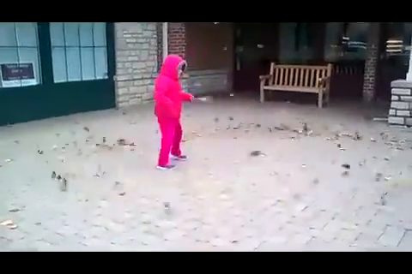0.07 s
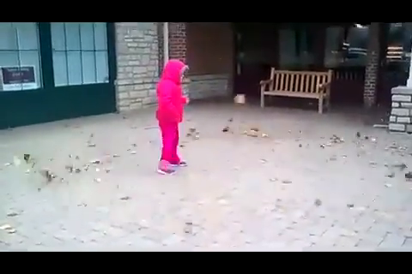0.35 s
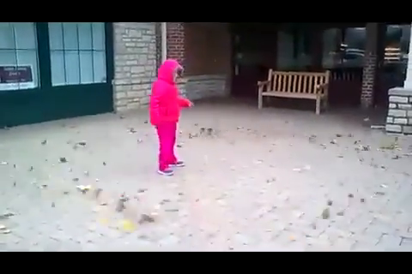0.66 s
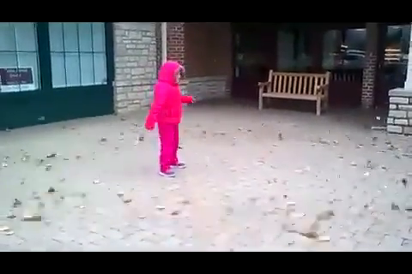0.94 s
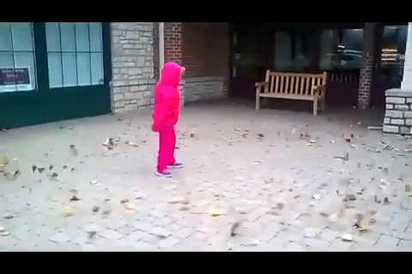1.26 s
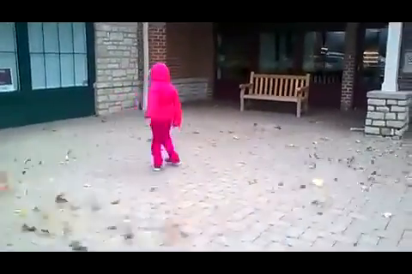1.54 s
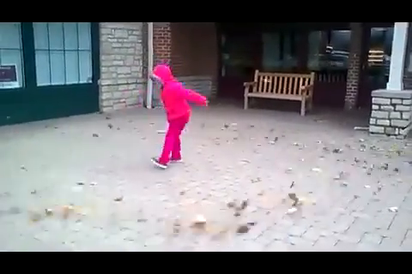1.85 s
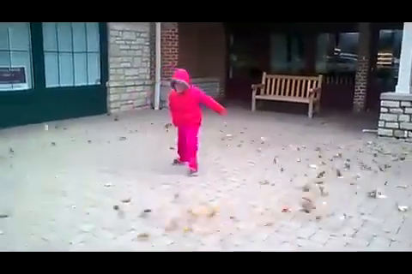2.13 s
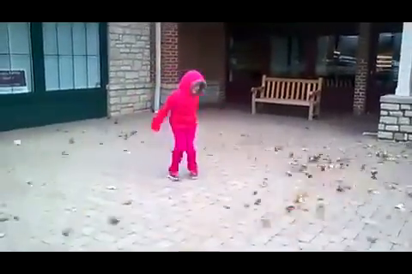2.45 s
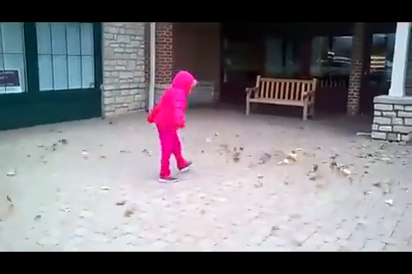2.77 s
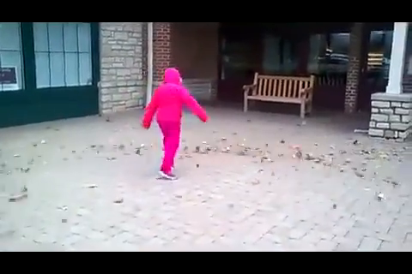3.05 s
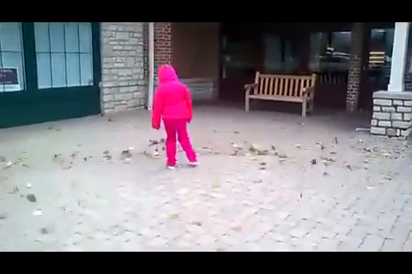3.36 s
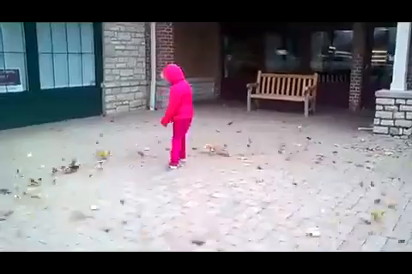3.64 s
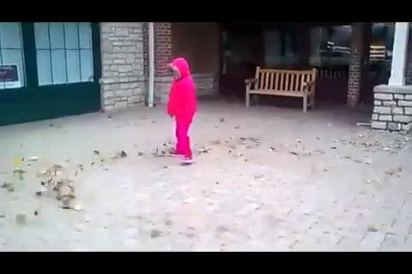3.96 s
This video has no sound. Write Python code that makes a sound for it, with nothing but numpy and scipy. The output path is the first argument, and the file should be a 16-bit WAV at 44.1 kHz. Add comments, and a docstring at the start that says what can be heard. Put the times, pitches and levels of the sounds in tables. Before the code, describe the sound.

Wind rumbles and thumps on the microphone as dry leaves swirl and scrape over paving.

```python
"""Gusty wind whirls dry leaves round a brick courtyard and buffets the microphone.
Eddies right on the microphone make a rumble that brightens as the air speeds up, with sharp thumps
as vortex cores cross it. Hundreds of leaves scrape and tick on the paving, and a few crackle close by.
Further off lies a steady rush of air and leaves."""
import sys
import numpy as np
from scipy import signal
from scipy.fft import rfft, irfft
from scipy.io import wavfile

SR = 44100
rng = np.random.default_rng(int(sys.argv[2]) if len(sys.argv) > 2 else 0)


def generate_wav(sig):
    """Save sig (samples, or channels by samples) to the path in sys.argv[1] as 16-bit PCM at SR."""
    pcm = np.round(np.clip(np.atleast_2d(sig).T, -1, 1) * 32767).astype(np.int16)
    wavfile.write(sys.argv[1], SR, pcm)


N = 4 * SR

# how hard the wind drives the leaves round the courtyard: t/s, level/dB
LEAF_DRIVE = [(0, 0.5), (.3, 0), (.65, 1), (.83, 1), (.97, 0.5), (1.17, 2), (1.32, 1.5), (1.8, 1),
              (2.25, 0.7), (2.46, -1), (2.59, .5), (2.72, -1.5), (2.98, 0), (3.34, -1), (3.45, 0),
              (3.77, 0.5), (3.88, -1), (4, 0)]


def undb(db):
    """Decibels to gain."""
    return 10 ** (np.asarray(db) / 20)


def unit(x):
    """Scale to rms 1."""
    return x / np.sqrt(np.mean(x ** 2))


def curve(rows):
    """Join (t/s, value) rows by straight lines."""
    return np.interp(np.arange(N) / SR, *np.array(rows).T)


def db_at(spectrum, hz):
    """Read (f/Hz, level/dB) rows on a log-frequency axis."""
    f, db = np.array(spectrum).T
    return np.interp(np.log(np.maximum(hz, 1)), np.log(f), db)


def colour(x, spectrum):
    """Filter by (f/Hz, level/dB) rows."""
    f = np.fft.rfftfreq(len(x), 1 / SR)
    return irfft(rfft(x) * undb(db_at(spectrum, f)), len(x))


def band(x, hz, octaves):
    """Cosine-shaped band that falls to zero this many octaves either side of hz."""
    away = np.log2(np.maximum(np.fft.rfftfreq(N, 1 / SR), 1) / hz) / octaves
    return irfft(rfft(x) * np.cos(np.pi / 2 * np.clip(away, -1, 1)), N)


def wander(per_s):
    """Smooth random motion of rms 1 that changes about per_s times a second."""
    f = np.fft.rfftfreq(N, 1 / SR)
    return unit(irfft(rfft(rng.standard_normal(N)) / (1 + (2 * f / per_s) ** 2), N))


def add(out, start_s, sound):
    """Mix a sound in at a time."""
    i = max(int(start_s * SR), 0)
    part = out[i:i + len(sound)]
    part += sound[:len(part)]


def rumble():
    """Large slow eddies rock the pressure at the microphone."""
    # swell of the deep rumble: t/s, level/dB
    swell = [(0, -15.5), (.1, -17.5), (.2, -17), (.38, -19.5), (.56, -22), (.79, -19.5), (.92, -28),
             (1.2, -31), (1.4, -28), (1.95, -23.5), (2.07, -29.5), (2.18, -19.5), (2.45, -28),
             (2.75, -22.5), (2.95, -34.5), (3.15, -21), (3.36, -32), (3.55, -16), (3.67, -28.5),
             (3.88, -22), (4, -35)]
    # spectrum of the slow pressure swings: f/Hz, level/dB
    spectrum = [(8, -29), (17, -1), (27, 2.5), (45, -5), (70, -10.5), (110, -24), (300, -58), (1000, -84)]
    return unit(colour(rng.standard_normal(N), spectrum)) * undb(curve(swell))


def buffeting():
    """Turbulence right on the microphone; faster air lifts the high bands more than the bass."""
    # airflow at the microphone between eddies: t/s, level/dB
    airflow = [(0, -8), (.15, -1.5), (.33, -7), (.43, -21), (.55, -3.5), (.77, -14), (.84, -21),
               (.95, -12.5), (1.2, -20.5), (1.5, -17), (1.85, -16), (2.2, -7), (2.3, -12.5), (2.5, -24),
               (2.95, -20), (3.35, -16), (3.55, -11), (3.7, -24), (4, -14)]
    # eddies that hit the microphone: centre t/s, length/s, level/dB
    eddies = [(.005, 0.021, 4), (0.095, 0.03, 0), (.203, 0.015, 2), (0.224, .012, 7.5), (0.246, 0.025, 4),
              (0.303, 0.037, 4), (0.381, 0.09, 1.5), (0.479, 0.052, 5.5), (0.531, 0.043, 4),
              (.613, 0.018, 5.5), (.653, 0.023, 2), (0.696, 0.02, -2), (.74, 0.032, 2.5), (0.773, 0.028, 0),
              (0.876, 0.029, -3), (0.906, 0.012, 0.5), (0.951, 0.017, 0.5), (.997, 0.018, 0.5),
              (1.09, 0.093, -10.5), (1.373, 0.036, -7.5), (1.517, 0.055, -7), (1.672, 0.039, -7.5),
              (1.9, .025, -15), (1.967, 0.031, -1.5), (2.084, 0.03, -1.5), (2.176, 0.028, 4.5),
              (2.208, 0.02, 3.5), (2.249, 0.023, 3), (2.38, 0.028, 0), (2.45, 0.083, -7.5),
              (2.503, 0.054, -2.5), (2.554, 0.053, -8.5), (2.708, 0.11, -11), (2.781, 0.049, -3),
              (3.168, 0.039, -2.5), (3.445, 0.012, -3), (3.533, 0.032, 0.5), (3.619, 0.013, -3.5),
              (3.703, 0.03, -7.5), (3.79, 0.024, -2), (3.878, 0.05, -5), (3.946, 0.019, -7)]
    # spectrum of a full eddy: f/Hz, level/dB
    spectrum = [(25, -9.5), (50, -1), (80, 0.5), (130, -4.5), (220, -5), (450, -10), (750, -19),
                (1200, -28), (1900, -38.5), (3000, -65)]
    t = np.arange(N) / SR
    power = undb(curve(airflow)) ** 2
    for centre, length, db in eddies:
        power += undb(db) ** 2 * np.exp(-2 * (2 * (t - centre) / length) ** 2)
    flutter_db = 3.1 * wander(per_s=115)
    flow_db = 10 * np.log10(power) + flutter_db
    air = unit(colour(rng.standard_normal(N), spectrum))
    out = np.zeros(N)
    for octave in range(8):
        hz = 25 * 2 ** octave
        air_band = band(band(air, hz, octaves=1), hz, octaves=1)  # twice, so the bands sum flat
        db_per_flow_db = 0.51 + 0.18 * octave
        out += air_band * undb(flow_db * db_per_flow_db)
    return out * undb(-18)


def distant_rush():
    """Wind and leaves far from the microphone blend smoothly, wavering a little in each octave."""
    # spectrum of the far air and leaves: f/Hz, level/dB
    spectrum = [(100, 15.5), (400, -4.5), (900, 4.5), (1400, -1), (2000, 4.5), (2900, -2), (4200, 1),
                (5100, -8), (6000, -20), (7000, -22.5), (10000, -22.5), (15500, -23.5)]
    air = np.zeros(N)
    for hz in 125 * 2 ** np.arange(8):
        noise = band(rng.standard_normal(N), hz, octaves=1)
        waver_db = 0.74 * wander(per_s=4.3)
        air += noise * undb(-waver_db)
    return unit(colour(air, spectrum)) * undb(-34 + 0.72 * curve(LEAF_DRIVE))


def skittering_leaves():
    """Countless tiny contacts on the paving, each in its leaf's band, surging as the leaves skitter."""
    # spectrum of dry leaves on brick: f/Hz, level/dB
    spectrum = [(600, -14), (1100, 2.5), (1900, 0.5), (2800, -0.5), (3600, -0.5), (4400, 0.5), (5200, -4),
                (6000, -14), (7000, -28.5), (10000, -29), (15500, -24.5)]
    contacts_per_s, spread_db, skitter_db = 5000, 2.5, 1.78  # the rate holds at 0 dB of drive
    drive_db = curve(LEAF_DRIVE)
    shared_skitter = wander(per_s=45)
    bands_hz = 700 * 2 ** np.arange(0, 5, .8)
    contact_chance = contacts_per_s / len(bands_hz) / SR * undb(drive_db)
    out = np.zeros(N)
    for hz in bands_hz:
        contacts = rng.random(N) < contact_chance
        strength = undb(spread_db * np.minimum(rng.exponential(size=N), 4.5))
        polarity = rng.choice([-1, 1], N)
        skitter = shared_skitter + 0.52 * wander(per_s=45)
        out += band(contacts * strength * polarity, hz, octaves=0.85) * undb(skitter_db * skitter)
    return unit(colour(out, spectrum)) * undb(-35.5 + drive_db / 2)


def thumps():
    """A vortex core crosses the microphone: a short push flanked by suction, then a low-pressure wake."""
    # vortex cores at the microphone: t/s, peak level/dB, centre f/Hz
    vortices = [(0.0975, -5, 121), (0.25, -11, 377), (0.3094, -8.5, 330), (0.3922, -1.5, 514),
                (0.476, 0, 520), (0.4967, -5.5, 550), (.534, -6.5, 420), (0.6193, -2.5, 660),
                (.649, -3.5, 740), (0.7334, -7.5, 272), (0.762, -7.5, 775), (2.1652, -5, 266),
                (2.2504, -5.5, 645), (2.381, -5, 590), (2.546, -13.5, 315), (2.562, -12, 173),
                (2.711, -11.5, 111), (2.7824, -8.5, 463), (3.5373, -2.5, 574), (3.562, -14, 645),
                (3.5861, -2, 463), (3.8747, -8, 394)]
    rise_cycles, fall_stretch = 0.26, 1.41
    wake_depth, wake_build_s = 0.26, 0.0015
    out, t = np.zeros(N), np.arange(-SR // 50, SR // 30) / SR
    wake_age = np.maximum(t, 0) / wake_build_s
    wake = wake_depth * wake_age * np.exp(1 - wake_age)
    width_cycles = rise_cycles * np.where(t < 0, 1, fall_stretch)
    for at, db, hz in vortices:
        push = np.cos(2 * np.pi * hz * t) * np.exp(-.5 * (hz * t / width_cycles) ** 2)
        add(out, at + t[0], undb(db) * (push - wake))
    return out


def close_crackles():
    """A leaf near the microphone snaps on the brick, rings for an instant and scrapes on."""
    # leaves striking the paving: t/s, peak level/dB, ring f/Hz, decay/ms
    strikes = [(0.292, -17.5, 1840, 4), (.325, -17, 2100, 4), (.475, -19, 1700, 3.2),
               (.648, -15, 1590, 2.8), (0.7992, -14.5, 4350, 1.5), (0.8112, -16, 3660, 0.92),
               (0.828, -18.5, 3540, 6.3), (.9785, -22, 2330, 2), (1.027, -15, 3650, 0.86),
               (1.048, -14.5, 2190, 0.65), (1.1206, -9, 3260, 1.9), (1.126, -31, 2930, 1),
               (1.129, -12.5, 3300, 0.9), (1.164, -17.5, 3330, 15), (2.024, -17.5, 1790, 3.7),
               (2.1882, -16, 1950, 0.85), (2.228, -15.5, 3780, 1.2), (2.385, -12.5, 3900, 2),
               (2.562, -23, 4520, 1.7), (2.5749, -12, 4100, .6), (2.5919, -12, 3480, 1.1),
               (2.835, -20, 2780, 14), (3.09, -17.5, 3900, 3.1), (3.208, -21, 2510, 2.3),
               (3.3289, -14.5, 1920, 2.3), (3.3446, -15.5, 2420, 1.5), (3.37, -17.5, 1950, 2.6),
               (3.785, -17, 4000, 3), (3.9477, -14, 1960, 1.4)]
    # spectrum of a leaf at close range: f/Hz, level/dB
    spectrum = [(500, -5), (1400, 0.5), (3500, -2.5), (4700, -1), (6000, -21.5), (7500, -23.5),
                (15000, -34)]
    snap_db, scrape_db, scrape_stretch = 13.5, -14, 6.5  # relative to the strike's noise burst
    ring_db, ring_q = 8, 6.3
    out, t = np.zeros(N), np.arange(SR // 12) / SR
    f = np.maximum(np.fft.rfftfreq(len(t), 1 / SR), 1)
    for at, db, hz, decay_ms in strikes:
        age = 1000 * t / decay_ms
        envelope = np.exp(-age) + undb(scrape_db) * np.exp(-age / scrape_stretch)
        contact = rng.standard_normal(len(t)) * envelope
        contact[0] += undb(snap_db)
        contact = np.roll(contact, 20)  # room for the filter to spread ahead of the snap
        ring = 1 + undb(ring_db) / (1 + 1j * ring_q * (f / hz - hz / f))
        crackle = irfft(rfft(contact) * ring * undb(db_at(spectrum, f)), len(t))
        add(out, at, crackle / np.abs(crackle).max() * undb(db))
    return out


def ticks():
    """Faint, very bright ticks among the leaves, each a brief swell of noise."""
    # single thin ticks: t/s, peak level/dB
    events = [(1.433, -42), (1.639, -39.5), (2.735, -40), (3.570, -45)]
    # spectrum of a tick: f/Hz, level/dB
    spectrum = [(5500, -14), (8000, -2.5), (10500, -3), (12000, -19), (15000, -27)]
    decay_s = 0.006
    out, t = np.zeros(N), np.arange(SR // 20) / SR
    for at, db in events:
        tick = colour(rng.standard_normal(len(t)), spectrum) * t * np.exp(-t / decay_s)
        add(out, at, tick / np.abs(tick).max() * undb(db))
    return out


def scene():
    """One microphone standing in the wind, with the courtyard round it."""
    wind_on_microphone = rumble() + buffeting() + thumps()
    courtyard = skittering_leaves() + close_crackles() + ticks() + distant_rush()
    return (wind_on_microphone + courtyard)[None]


def record(dry):
    """Peaks clip at full scale and the highest treble is cut; a 2 ms fade-in prevents a start click."""
    fade_s, top_hz = 0.002, 15800
    fade_in = np.minimum(np.arange(N) / (fade_s * SR), 1)
    lowpass = signal.ellip(10, .2, 80, top_hz, fs=SR, output="sos")
    return signal.sosfilt(lowpass, np.clip(dry, -1, 1) * fade_in)


dry = scene()
out = record(dry)
generate_wav(out)
```